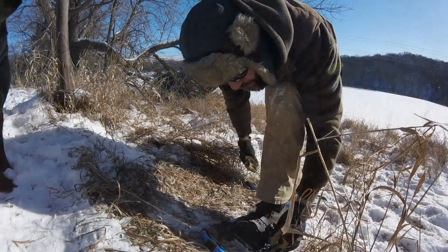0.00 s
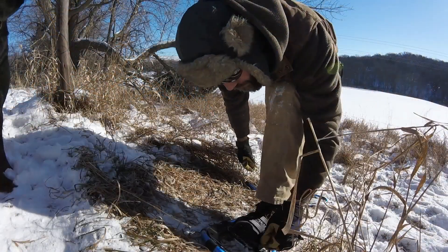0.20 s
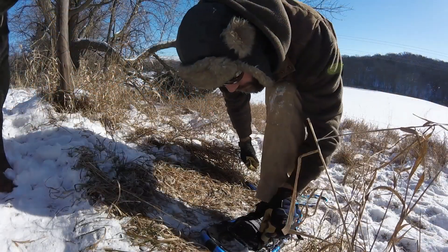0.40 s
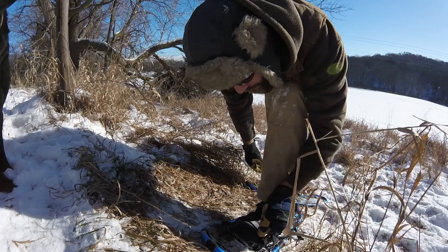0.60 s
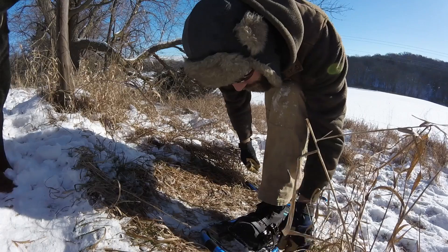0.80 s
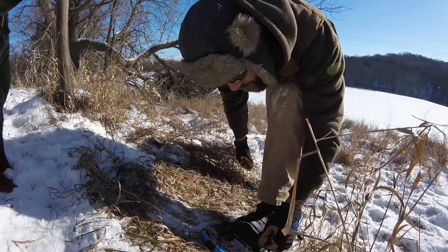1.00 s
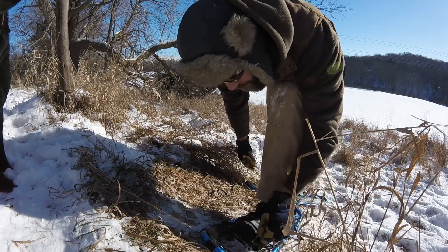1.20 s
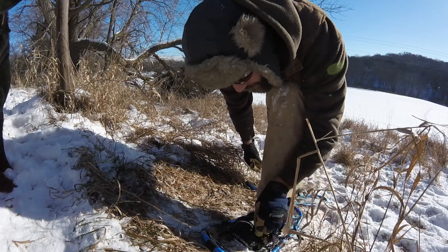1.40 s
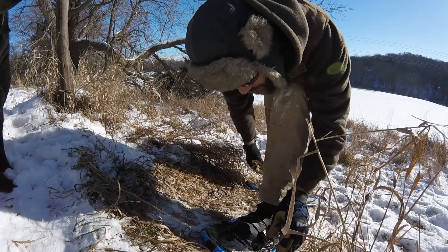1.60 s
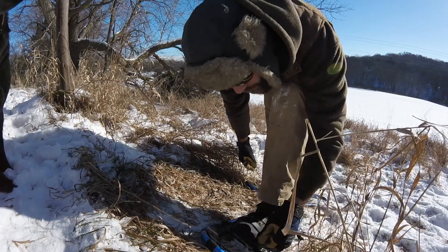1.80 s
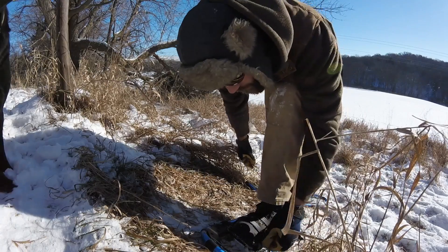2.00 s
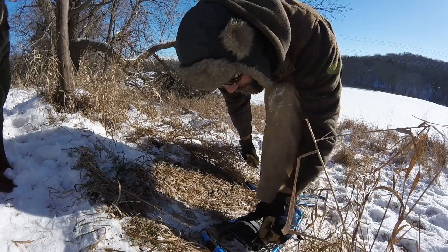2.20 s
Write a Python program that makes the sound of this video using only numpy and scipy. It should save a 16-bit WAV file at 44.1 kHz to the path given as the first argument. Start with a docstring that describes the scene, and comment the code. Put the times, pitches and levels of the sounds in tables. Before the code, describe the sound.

Plastic binding buckles and straps click and tick onto a boot in snow.

```python
"""A snowy field: a plastic binding is worked onto a boot, a metre from a small cased camera.
Buckle and strap contacts ring short modes as clicks, knocks and thuds; snow grains settle after each.
Snow and dry grass rustle under the frame in dense grains. Wind rumbles on the case over a soft hiss,
and a distant bird ends one whistle."""
import sys
import numpy as np
from scipy import signal
from scipy.fft import rfft, irfft
from scipy.io import wavfile
from scipy.ndimage import uniform_filter1d

SR = 44100
rng = np.random.default_rng(int(sys.argv[2]) if len(sys.argv) > 2 else 0)


def output_pcm(signal):
    """Save a mono or channel-first signal as 16-bit PCM at the path in sys.argv[1].

    Samples are clipped to [-1, 1] before scaling.
    """
    pcm = np.clip(np.atleast_2d(signal).T, -1, 1) * 32767
    wavfile.write(sys.argv[1], SR, np.round(pcm).astype(np.int16))


N = 101430

# Buckle and strap contacts. Each row: start in seconds, snap level in dB, thud, knock, tick and sizzle
# in dB, thud and knock pitch in Hz, ping and edge in dB, ring-time factor of knock and thud, clack in dB.
# Levels after the snap are relative to it.
CLICKS = [(0.1818, -64, 15, 14, -4, -13, 269, 980, -10, -12, 0.82, -1),
          (0.1893, -65.5, -14, 13, 2, -16, 194, 780, -14, -12, 0.93, -7),
          (0.2238, -49.5, -5, -4, -19, -24, 194, 920, -17, -17, 0.64, -11),
          (0.275, -49.5, 7, 6.5, -8, -21, 185, 834, -12, -11, 0.93, -20),
          (0.2783, -49.5, 0.5, -2.5, -20, -22, 207, 640, -5, -11, 1.5, -13),
          (0.2832, -40.5, -7, -13, -8, -19, 420, 1050, -7, -10, 1.43, -21),
          (0.3149, -67.5, 20.5, 17, 3, -17, 460, 597, -5, -10, 1.8, -6),
          (0.3191, -47, 10, 3.5, -24, -31, 282, 715, -17, -16, 0.79, -21),
          (0.3725, -27.5, -2, 4.5, -4.5, -25, 468, 806, -9.5, -12, 0.91, -2),
          (0.416, -62.5, 12, -3, -3, -14, 178, 890, -12, -15, 1.24, -6),
          (0.5446, -20.5, -20, -10.5, -20.5, -28, 400, 833, -18.5, -15, 0.8, -21.5),
          (0.5817, -61.5, 8, 5, -13, -10, 180, 670, -10, -4, 1.1, -2),
          (0.5961, -26, -41, -8, -8, -7.5, 490, 873, -14.5, -7, 1.38, -11),
          (0.6133, -53, -10, -19, -12, -9, 240, 870, -1, -11, 1.4, -14),
          (0.7992, -51, -7, -15, -13, -18, 231, 594, -11, -11, 1.6, -14),
          (0.8074, -50.5, -1, -1.5, -7, -10, 191, 875, -15, -8, 1.1, -7),
          (0.8263, -53.5, 16, 10, -8, -13, 184, 650, -13, -16, 1.4, -8),
          (0.8287, -45, 9.5, 11, -10, -12, 360, 910, -5, -9, 0.99, -10),
          (0.832, -25, -2.5, -15, -12, -23, 331, 620, -10.5, -13, 0.47, -17),
          (0.8339, -26.5, -18, -7.5, -13, -16, 367, 563, -12, -10, 0.98, -23),
          (0.837, -11.5, -24, -14, -21.5, -19.5, 494, 692, -13, -12.5, 0.61, -21.5),
          (0.8444, -59, 5, 10, -13, -14, 186, 850, -16, -14, 1.7, -14),
          (1.0004, -70.5, -10, 14, -6, -11, 180, 740, -5, 2, 1.2, -5),
          (1.0267, -49, 0.5, -5.5, -2, -17, 188, 940, -18, -10, 0.94, -13),
          (1.0535, -53.5, -5, -2.5, -6, -25, 180, 583, -8, -16, 1.4, -16),
          (1.0581, -54, 5.5, -24, -12, -23, 342, 759, -8, -10, 0.98, -22),
          (1.0804, -55.5, 0.5, -23, -13, -23, 498, 600, -11, -8, 1.2, -17),
          (1.0852, -65, -5, -2, 5, -16, 180, 766, -3, -3, 1.2, -8),
          (1.1, -50, -23, -8.5, -8, -32, 180, 900, -13, -10, 1.2, -19),
          (1.1052, -56, 1, -9, 0, -30, 280, 700, -16, -14, 1.3, -20),
          (1.1547, -58, 8, 8, -20, -29, 180, 754, -21, -19, 1.7, -13),
          (1.1607, -32.5, 3, -6, -12.5, -26, 356, 586, -14, -18, 0.82, -15),
          (1.2076, -68.5, 11, 10, 1, -14, 480, 647, -1, -8, 0.72, -1),
          (1.2438, -42, 5.5, 0, -12, -19, 268, 864, -11.5, -23, 1.23, -29),
          (1.3839, -49, -6.5, -16, -4.5, -16, 253, 814, -13, -13, 1.1, -20),
          (1.429, -30, -26.5, -20.5, -17, -23, 202, 830, -14.5, -17.5, 1.17, -38),
          (1.4792, -83, 33, 11, -2, -1, 181, 786, 5, 6, 0.97, 3),
          (1.5186, -20, -24, -11, -13, -8.5, 440, 930, -15.5, -7.5, 0.81, -24),
          (1.5264, -45, -14, -5.5, -30, -5, 221, 830, -8, -15, 0.8, -16),
          (1.6194, -59, 3, 3.5, -1, -22, 371, 694, -16, -9, 1.05, -7),
          (1.6717, -40.5, 5.5, 7, -8.5, -24, 188, 786, -17, -12, 0.9, -9),
          (1.676, -30.5, 1, -19, -16, -23, 265, 620, -17, -7, 0.85, -20),
          (1.6796, -40, -22, -7, 1, 5, 177, 820, -6, -28, 0.71, -11),
          (1.6826, -16.5, -16.5, -12, -15.5, -19, 244, 690, -13, -12, 0.86, -20),
          (1.9018, -56, 16.5, 14.5, -9, -17, 383, 720, -10, -18, 0.85, -17),
          (1.9137, -45, -0.5, -16, -7, -11, 485, 700, -10, -22, 1.5, -4),
          (1.917, -32, -10.5, -8.5, -5.5, -18, 272, 785, -11, -13, 1.3, -14),
          (1.9273, -44, -23, -4, -2, -31, 183, 605, -31, -7.5, 0.46, -12),
          (1.951, -52, -6, -1, -8.5, -28, 328, 795, -9, -10, 1.05, -15),
          (1.9806, -67, 6, -6, -6, -20, 210, 670, -13, -15, 1.4, -12),
          (2.0454, -55, -11, -12, -7, -23, 235, 856, -18, -6, 1.4, -12),
          (2.0534, -59, 14, 3, 1, -19, 174, 736, -14, -12, 1.1, -3.5),
          (2.0601, -48.5, 3, -2.5, -15, -25, 404, 710, -18, -8.5, 1.3, -5.5)]


def amp(db):
    return 10 ** (np.asarray(db) / 20)


def colour(x, points):
    """Minimum-phase filter through (Hz, dB) points; output rms 1."""
    hz, db = np.array(points, float).T
    n = len(x)
    bin_hz = np.maximum(np.fft.rfftfreq(n, 1 / SR), 1)
    gain_db = np.interp(np.log(bin_hz), np.log(hz), db, left=-60, right=-60)
    cepstrum = irfft(np.log(amp(gain_db)), n)
    cepstrum[1:n // 2] *= 2
    cepstrum[n // 2 + 1:] = 0
    y = irfft(rfft(x) * np.exp(rfft(cepstrum)), n)
    return y / np.std(y)


def drift(rate_hz):
    """Smooth random drift, standard deviation 1."""
    width = int(SR / rate_hz)
    y = uniform_filter1d(uniform_filter1d(rng.standard_normal(N), width), width)
    return y / np.std(y)


def ring(hz, db, t60_s, t):
    """A struck mode: a decaying sine."""
    return amp(db) * np.sin(2 * np.pi * hz * t) * np.exp(-np.log(1000) * t / t60_s)


def wind(t):
    """Low wind rumble, wavering in level."""
    # Each row: frequency in Hz, spectral density in dB.
    spectrum = [(15, 0.5), (28, 2.5), (60, -5), (100, -9), (140, -18.5), (250, -35.5)]
    # Each row: time in seconds, level in dB.
    rumble_levels = [(0.0, -49), (0.03, -50.5), (0.26, -44.5), (0.29, -53), (0.53, -50), (0.98, -49.5),
                     (0.99, -49), (1.39, -47), (1.46, -59), (1.48, -48), (2.25, -49.5), (2.3, -53.5)]
    rumble = colour(rng.standard_normal(N), spectrum)
    return rumble * amp(np.interp(t, *np.array(rumble_levels).T) + 0.5 * drift(3.6))


def hiss():
    """Soft, even background noise."""
    # Each row: frequency in Hz, spectral density in dB.
    spectrum = [(88, -21), (150, -0.5), (293, -6), (783, -9), (1160, -16), (1360, -14.5), (2810, -20),
                (4970, -23), (7970, -28.5), (13600, -36), (16500, -41)]
    return colour(rng.standard_normal(N), spectrum) * amp(-62)


def bird(t):
    """A near-pure whistle that sags and fades, fluttering from echoes."""
    # Each row: time in seconds, pitch in Hz, level in dB.
    whistle = [(0, 3630, -76), (.022, 3670, -65.5), (.08, 3684, -62.5), (.15, 3655, -65), (.2, 3615, -71),
               (.265, 3578, -76), (.28, 3570, -100)]
    time_s, hz, db = np.array(whistle).T
    phase = 2 * np.pi * np.cumsum(np.interp(t, time_s, hz)) / SR
    level_db = np.interp(t, time_s, db, right=-200) + 1.3 * drift(49)
    return np.sqrt(2) * np.sin(phase) * amp(level_db)


def rustle(t):
    """Snow and dry grass under the frame: uneven grains in patches, a low crunch and a fine swish."""
    # Each row: time in seconds, crunch level in dB, swish level in dB.
    patches = [(0, -73.5, -72), (.11, -62, -70), (.2, -63, -71), (.31, -61, -72.5), (.42, -56.5, -71),
               (.5, -66, -69), (0.618, -59, -62), (.66, -51.5, -69.5), (.72, -71, -72), (.8, -61, -67),
               (.92, -68, -76), (1.0, -66, -72.5), (1.1, -59, -73.5), (1.22, -66, -72), (1.33, -72.5, -77),
               (1.46, -64, -74), (1.6, -60, -67.5), (1.75, -69, -70.5), (1.86, -67.5, -71),
               (1.97, -59.5, -71), (2.1, -70, -77), (2.3, -60, -73)]
    # Grain spectra. Each row: frequency in Hz, gain in dB.
    crunch = [(150, -19), (300, 6), (800, 5), (1100, -4), (1600, -13.5), (2500, -16)]
    swish = [(1000, 12), (1500, -11.5), (3000, 5.5), (3700, 0), (5200, 2.5), (7000, -7), (8200, -7),
             (10000, -17), (14000, -4)]
    time_s, crunch_db, swish_db = np.array(patches).T
    out = 0
    for db, spectrum, grains_per_s in ((crunch_db, crunch, 1500), (swish_db, swish, 9900)):
        onsets = rng.random(N) < grains_per_s / SR
        grains = onsets * rng.standard_normal(N) * amp(3 * rng.exponential(size=N))
        out += colour(grains, spectrum) * amp(np.interp(t, time_s, db) + 0.57 * drift(37))
    return out


def contact(t):
    """One hard impulse inside a brief, spiky scrape."""
    rise_s, decay_s = 0.0004, 0.001
    chatter = rng.standard_normal(len(t)) ** 3
    unit_energy_gain = np.sqrt(2 / (15 * decay_s * SR))
    force = amp(-5) * unit_energy_gain * chatter * np.exp(-t / decay_s)
    force *= 1 - np.exp(-t / rise_s)
    force[int(rise_s * SR)] = 1
    return force


def binding_clicks():
    """A chattering contact rings the camera housing's bright modes; a softer push rings knock and thud."""
    # Housing modes, low to high. Each row: frequency in Hz, relative level in dB, t60 in seconds.
    clack = [(1405, 13.5, 0.0044), (1718, 12.1, 0.0042)]
    tick = [(1950, -23, 0.0033), (2360, -4.5, 0.0037), (3000, -3.5, 0.0099), (3440, -8.5, 0.0058)]
    ping = [(4410, 10.24, 0.0061)]
    snap = [(5370, -3, 0.0048)]
    edge = [(5830, 4.8, 0.0067), (6514, 8.54, 0.0045)]
    sizzle = [(8750, -13, 0.0048), (9660, -3.5, 0.0037), (11400, -11, 0.0051), (12900, -8.5, 0.0047)]
    # Each row: ratio to the knock pitch, relative level in dB, base t60 in seconds.
    knock_modes = [(0.722, -4.5, 0.016), (0.998, 1, 0.015), (1.302, -3, 0.0067)]
    size, push_rise_s, thud_t60_s = 2048, 0.0011, 0.013
    t = np.arange(size) / SR
    push = 1 - np.exp(-t / push_rise_s)
    out = np.zeros(N + size)
    for (start_s, snap_db, thud_db, knock_db, tick_db, sizzle_db,
         thud_hz, knock_hz, ping_db, edge_db, ring_factor, clack_db) in CLICKS:
        groups = ((clack, clack_db), (tick, tick_db + 11.5), (ping, ping_db),
                  (snap, 0), (edge, edge_db), (sizzle, sizzle_db + 8.5))
        modes = [(hz, group_db + db, t60_s) for group, group_db in groups for hz, db, t60_s in group]
        detune = 1 + 0.01 * rng.standard_normal(len(modes))
        response = sum((-1) ** k * ring(hz * detune[k], db, t60_s, t)
                       for k, (hz, db, t60_s) in enumerate(modes))
        bright = signal.fftconvolve(contact(t), response)[:size]
        knock = sum(ring(knock_hz * ratio, knock_db + 14 + db, t60_s * ring_factor, t)
                    for ratio, db, t60_s in knock_modes)
        thud = sum(ring(thud_hz * ratio, thud_db + db, thud_t60_s * ring_factor, t)
                   for ratio, db in ((1, 14.5), (0.5, 7)))
        start = int(start_s * SR)
        out[start:start + size] += amp(snap_db) * (bright + push * (knock + thud))
    return out[:N]


def shape_clicks(x):
    """Clicks with thin bass, a soft top and one narrow notch."""
    band_hz, notch_hz = [110, 13600], 3730
    dulled = signal.sosfilt(signal.butter(3, band_hz, "band", fs=SR, output="sos"), x)
    return signal.lfilter(*signal.iirnotch(notch_hz, Q=16, fs=SR), dulled)


def settling_snow():
    """Grains settle after each click: a faint spray, and a shimmer that follows the click's sizzle."""
    # Grain spectra. Each row: frequency in Hz, gain in dB.
    spray = [(1500, -9), (3000, -6.5), (3700, -3.5), (5500, -5), (7000, -0.5), (8500, -20)]
    shimmer = [(7500, -16), (8700, 1), (10000, 3), (11500, -5), (13000, 1), (14500, -15)]
    lag_s, t60_s = 0.002, 0.18
    kicks = np.zeros((2, N))
    for start_s, snap_db, _, _, _, sizzle_db, *_ in CLICKS:
        kicks[:, int((start_s + lag_s) * SR)] += amp([snap_db - 40, snap_db + sizzle_db - 29.5])
    pole = np.exp(-np.log(1000) / (t60_s * SR))
    envelopes = uniform_filter1d(signal.lfilter([1], [1, -pole], kicks), 300)
    grains = [colour(rng.standard_normal(N) * amp(3 * drift(250)), spectrum)
              for spectrum in (spray, shimmer)]
    return (envelopes * grains).sum(0)


def scene():
    t = np.arange(N) / SR
    field = wind(t) + hiss() + bird(t)
    handling = rustle(t) + shape_clicks(binding_clicks()) + settling_snow()
    return (field + handling)[None]


def record(dry):
    """The camera cuts the top."""
    cutoff_hz = 16400
    return signal.sosfilt(signal.ellip(10, 0.2, 70, cutoff_hz, fs=SR, output="sos"), dry)


dry = scene()
out = record(dry)
output_pcm(out)
```